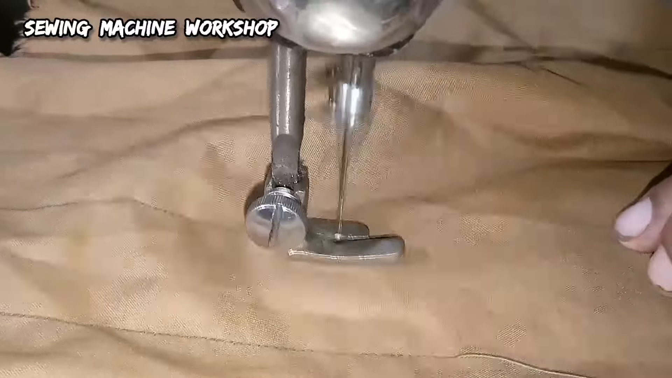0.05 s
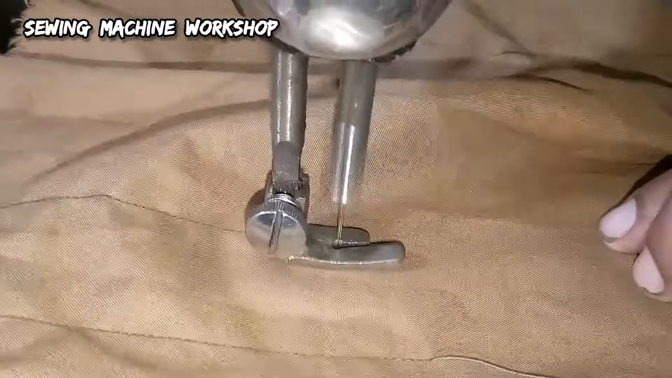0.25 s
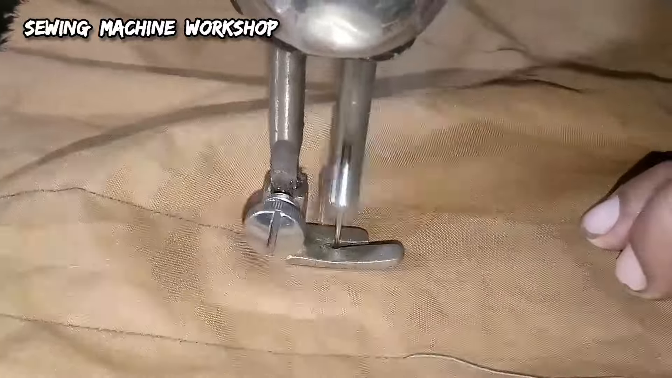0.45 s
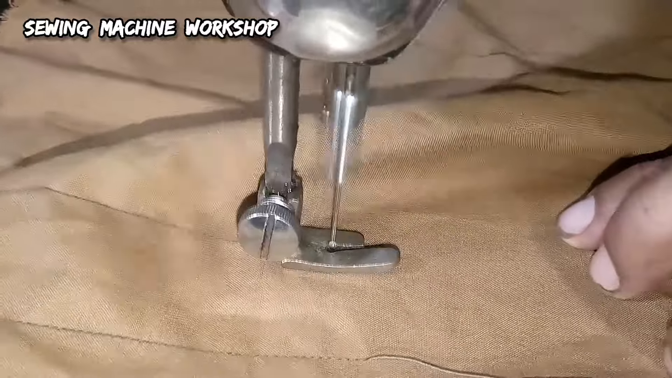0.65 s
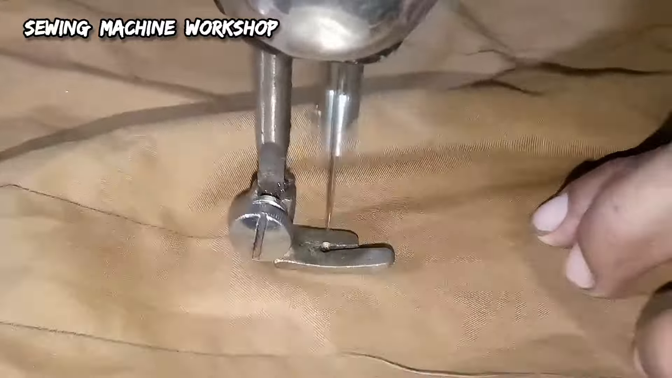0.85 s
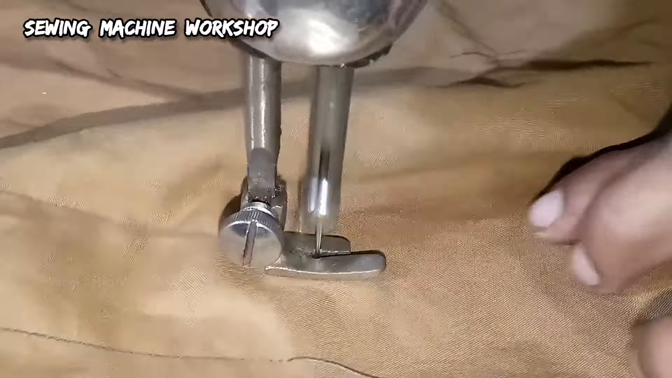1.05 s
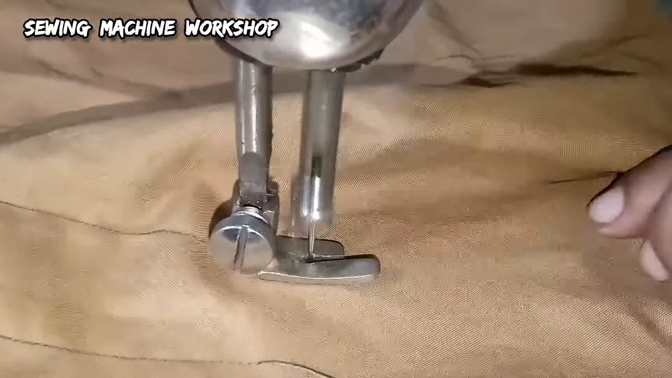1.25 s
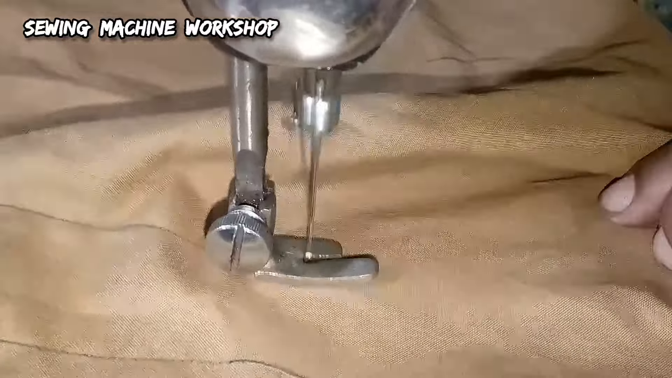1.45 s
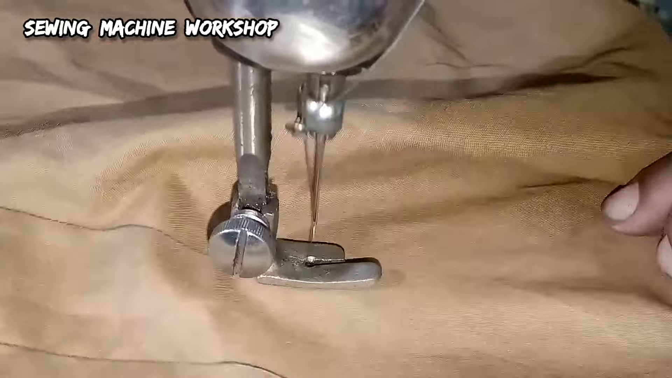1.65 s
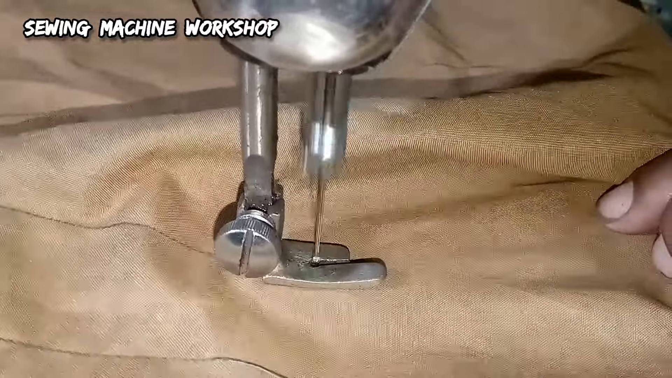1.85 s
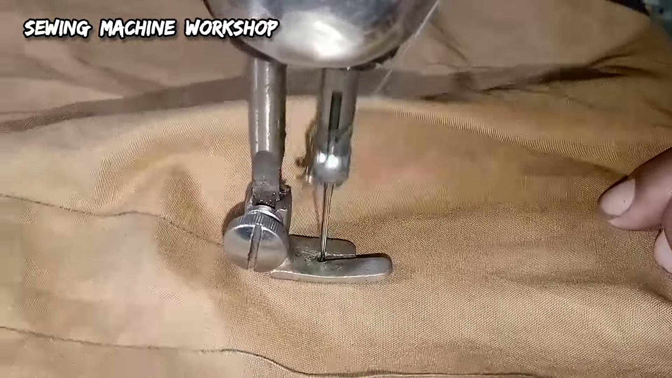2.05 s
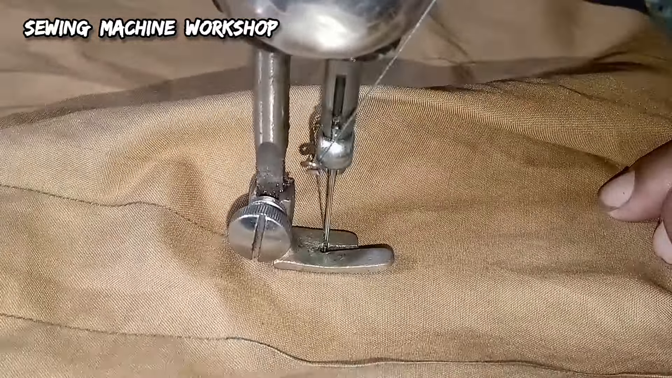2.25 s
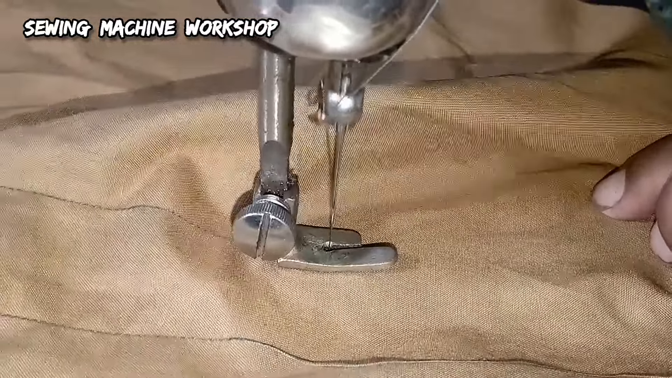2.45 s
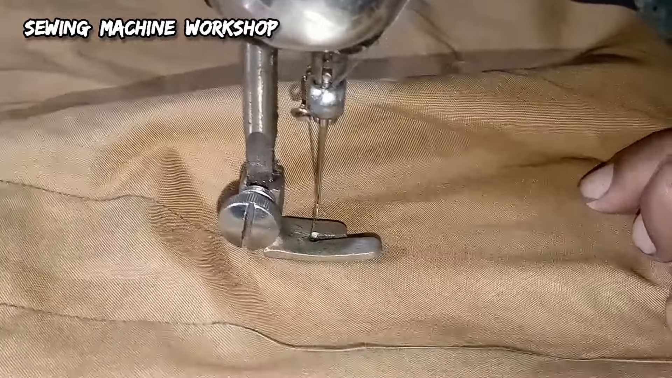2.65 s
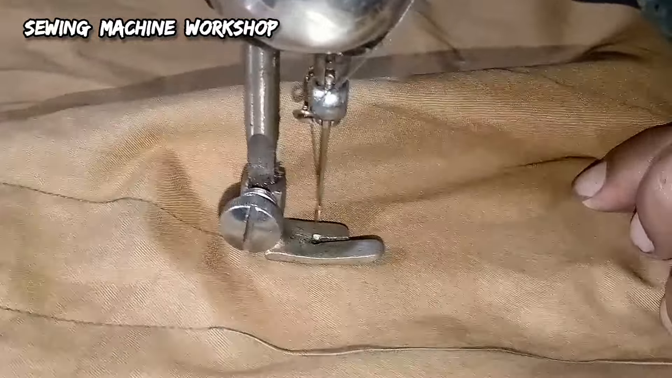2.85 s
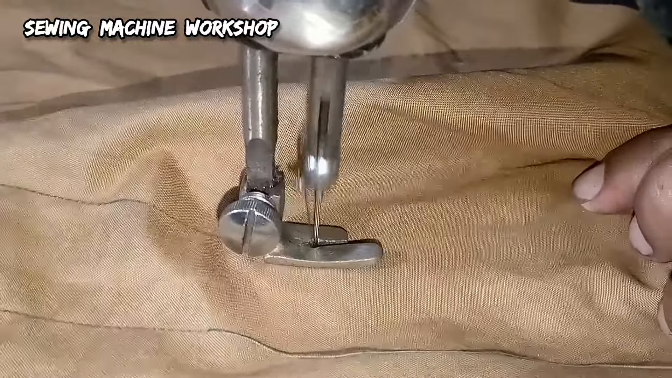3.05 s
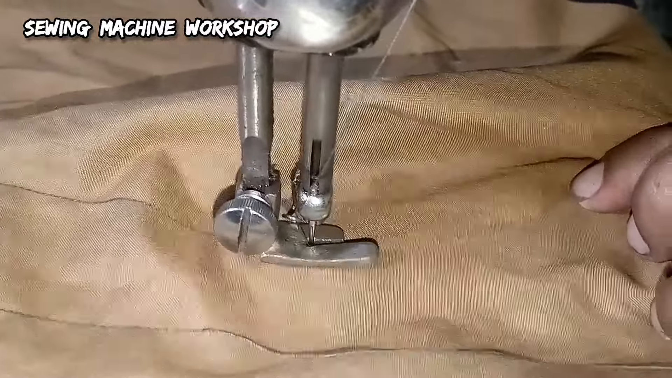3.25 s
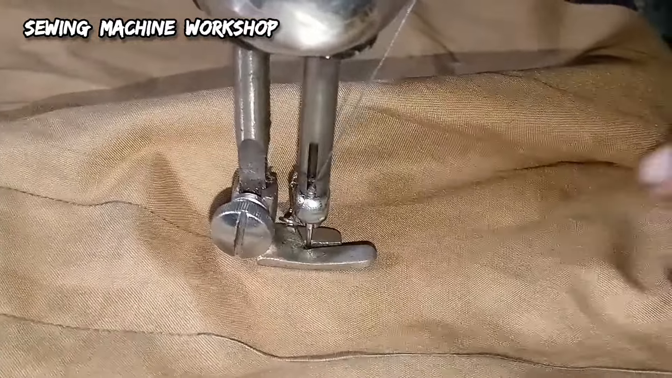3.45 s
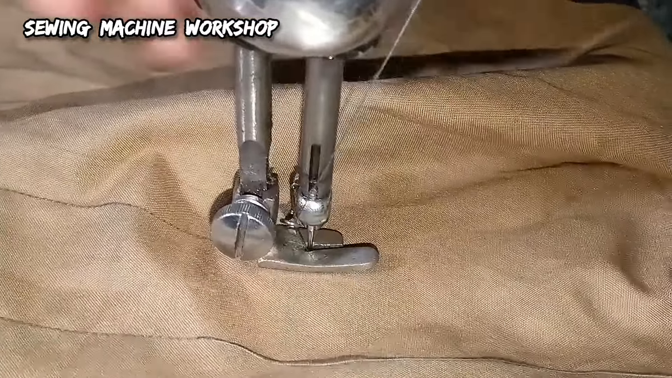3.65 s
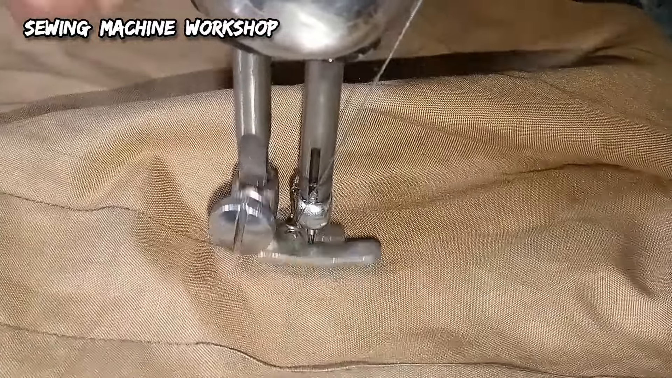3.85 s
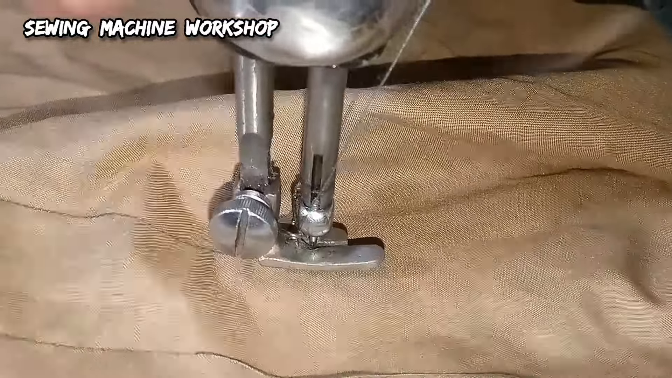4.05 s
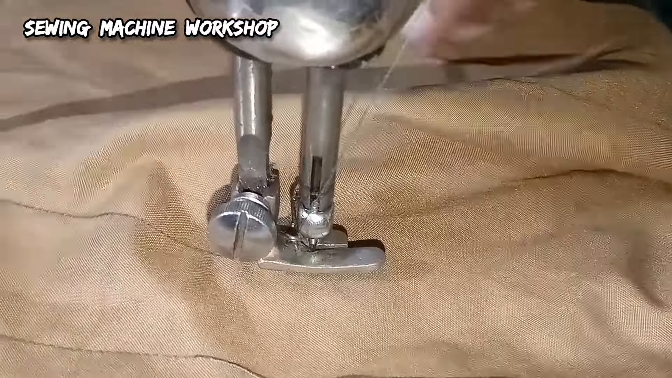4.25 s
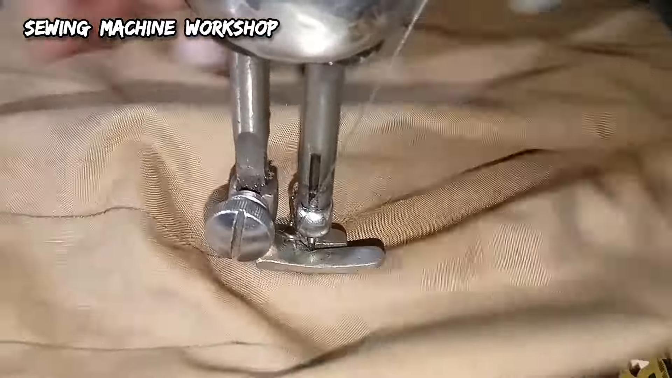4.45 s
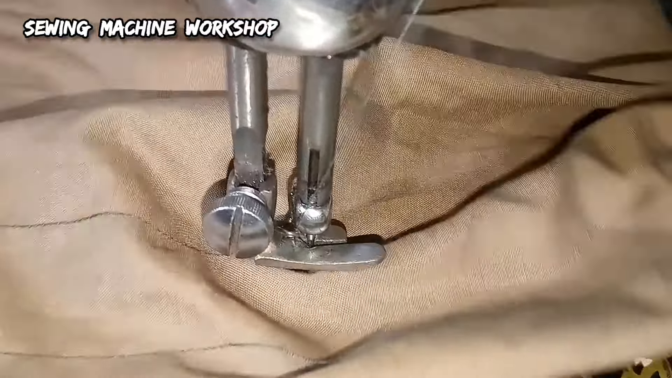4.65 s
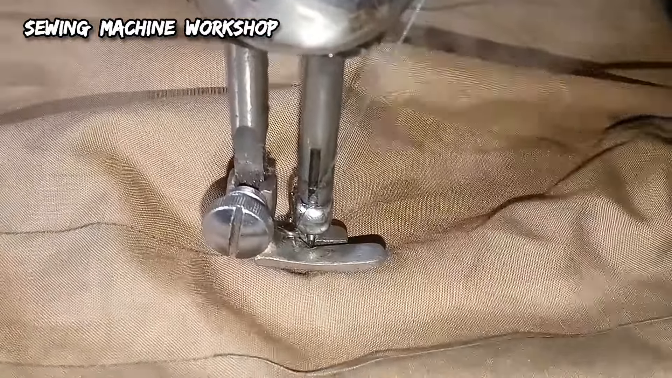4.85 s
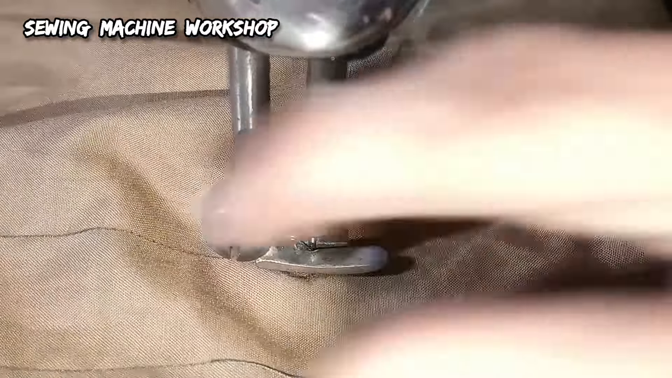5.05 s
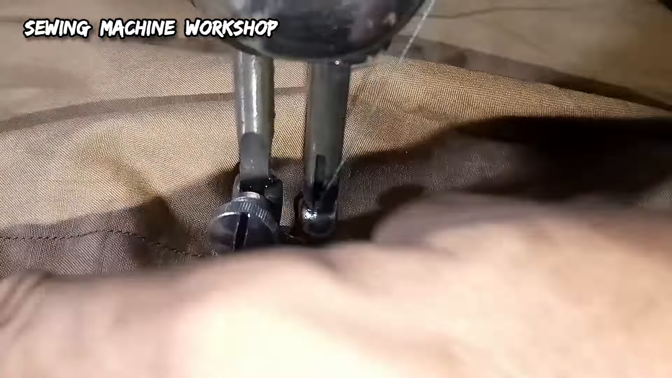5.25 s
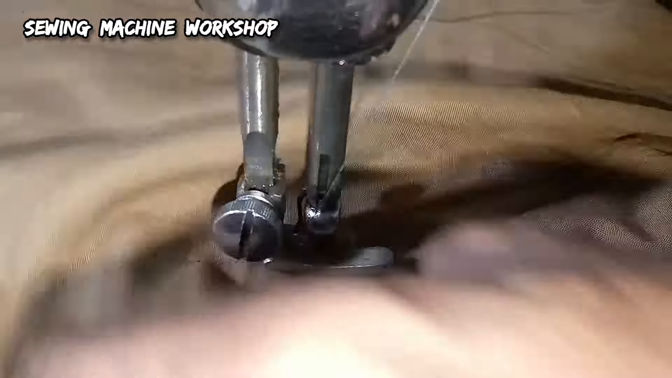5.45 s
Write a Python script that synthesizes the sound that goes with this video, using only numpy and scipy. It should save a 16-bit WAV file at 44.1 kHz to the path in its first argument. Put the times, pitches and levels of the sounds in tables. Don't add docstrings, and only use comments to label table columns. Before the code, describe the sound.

The sound begins with a sewing machine already running, very close: about eighteen sharp metallic clacks a second, each with steel ring, iron arm knock, and gear rattle between, over a low wooden table rumble. An especially hard clack comes near 0.96 s. From about 1.1 s it slows, the clacks separating and dulling, with last loose knocks at 1.7, 1.9 and 1.96 s. Then it is much quieter: low room and street murmur, faint hiss, and a distant high cricket throbbing about ten times a second. From 2.3 to 3.4 s come tiny irregular ticks, fine scratching and soft crackling cloth, with a clearer double tick at 3.14. A dull wooden thud falls at 3.8, then a bright lever crack with a heavier landing at 3.94. Between 4.4 and 5.5 s fabric rustles and small soft bumps tail off. Phone microphone, little deep bass, short close wall echo.

```python
import sys
import numpy as np
from scipy import signal
from scipy.fft import rfft, irfft
from scipy.io import wavfile
from scipy.ndimage import uniform_filter1d

SR = 44100
rng = np.random.default_rng(int(sys.argv[2]) if len(sys.argv) > 2 else 0)


def undo_db(level):
    steps = np.asarray(level, float) / 20
    return 10 ** steps


def unload_wav(signal):
    wavfile.write(
        sys.argv[1],
        SR,
        np.round(np.clip(np.atleast_2d(signal).T, -1, 1) * 32767).astype(np.int16),
    )


N = 242546
TIME = np.arange(N) / SR

# t/s, treble peak/dB, bed plate peak/dB, arm ring/dB
STITCH = [(0.0152, -29, -36, -22.5), (0.0706, -22, -20, -25.5), (0.1258, -20, -18, -22),
          (0.1788, -27, -25, -24), (0.2418, -25.5, -17, -22.5), (0.2927, -29, -38, -32),
          (0.3529, -28, -20.5, -22.5), (0.4147, -28, -27.5, -18.5), (0.4754, -24, -14.5, -18),
          (0.5281, -25.5, -22, -21), (0.5822, -26.5, -24.5, -21), (0.6377, -24.5, -19.5, -32),
          (0.6968, -27, -22.5, -28), (0.7508, -25, -33.5, -29), (0.8059, -24, -20, -15),
          (0.857, -24, -33, -15), (0.9087, -28.5, -17, -22), (0.9589, -18.5, -7, -16.5),
          (1.0213, -25.5, -17, -29), (1.084, -25.5, -28, -30), (1.1488, -28.5, -22.5, -24),
          (1.2063, -28, -26, -34), (1.275, -36, -24, -24), (1.349, -33, -20, -30), (1.4276, -29, -28, -25),
          (1.512, -30.5, -17.5, -46), (1.6046, -38, -15, -36), (1.723, -36, -18.5, -40),
          (1.8937, -41, -19.5, -53)]
START_S, CLACK_DB, BED_DB, ARM_DB = np.transpose(STITCH)
TURN_S = np.abs(np.diff(np.append(START_S, 1.6)))

# f/Hz, width/Hz, level/dB
FRAME = [(183, 21, -12.5), (251.6, 21.2, -4), (282, 16.5, -4), (333, 57, -10), (412.3, 18.4, -1.5),
         (446.1, 11, -2), (546, 350, -17.5)]
# f/Hz, width/Hz, level/dB
ARM = [(625, 15, -21.5), (783, 63, -11.5), (963, 35, -16.5), (1056.6, 20, 1), (1196, 1100, -22)]
# f/Hz, width/Hz, level/dB
BED = [(1562, 180, -6), (1797, 68, 3), (1907, 75, 3), (2087, 296, -3.5), (2389, 110, 4), (2573, 145, 0.5),
       (2811, 110, -3.5), (3048, 720, -15.5)]
# f/Hz, width/Hz, level/dB
STEEL = [(4905, 460, -4.5), (5657, 330, 1.5), (6173, 286, 6), (6573, 340, -2), (6990, 540, -9.5)]
# f/Hz, width/Hz, level/dB
AIR = [(8600, 860, -2), (10000, 1200, -3.5), (10800, 770, -3), (12300, 2700, -13), (14900, 900, -4.5)]


def unit(x):
    return x / np.sqrt(np.mean(x ** 2))


def steady(x, window_s=.12):
    return x / np.sqrt(uniform_filter1d(x ** 2, int(window_s * SR)) + 1e-12)


def swell(s, rise_s, hold_s, fall_s, db):
    early = np.maximum(s - TIME, 0) / rise_s
    late = np.maximum(TIME - s - hold_s, 0) / fall_s
    return undo_db(db - 30 * (early + late))


def filtered(x, order, hz, kind):
    return signal.sosfilt(signal.butter(order, hz, kind, fs=SR, output="sos"), x)


def resonate(x, modes):
    out = 0
    for k, (hz, width_hz, db) in enumerate(modes):
        mode = signal.lfilter(*signal.iirpeak(hz, hz / width_hz, SR), x)
        out = out + (-1) ** k * undo_db(db) * mode
    return out


def treble(force):
    cluster = filtered(resonate(force, STEEL), 3, [4300, 7600], "bandpass")
    top = filtered(resonate(force, AIR), 4, 7800, "highpass")
    return cluster + undo_db(-25.5) * top


def ring(force, part):
    if part is STEEL:
        return treble(force)
    return filtered(resonate(force, part), 3, 1.45 * part[-1][0], "lowpass")


def clicks(per_s, spread_db):
    when = rng.random(N) < per_s / SR
    size_db = spread_db * np.minimum(rng.exponential(size=N), 3)
    return unit(when * rng.standard_normal(N) * undo_db(size_db))


def blows(times_s, dbs, contact_ms, tick=1):
    force, t = np.zeros(N + 1024), np.arange(1024) / SR
    chatter = rng.standard_normal((len(times_s), 1024)) * 0.22
    chatter[:, 0] = tick
    for s, db, ms, row in zip(times_s, dbs, contact_ms, chatter):
        i = int(np.clip(s * SR, 0, N - 1))
        row = row * np.exp(-1000 * t / max(ms, .02))
        force[i:i + 1024] += undo_db(db) * row / np.sqrt(np.sum(row ** 2))
    return force[:N]


def struck(part, times_s, peak_db, contact_ms, tick=1):
    reference = np.abs(ring(signal.unit_impulse(4096), part)).max()
    return ring(blows(times_s, peak_db, contact_ms, tick), part) / reference


def shaft_turns(**after_last):
    return np.interp(TIME, np.append(-.04, START_S), np.arange(len(START_S) + 1.), **after_last)


def running_levels():
    # t/s, level/dB
    load = [(0, -16.5), (.03, -24), (.42, -26.5), (.58, -24), (.96, -24), (1.1, -26), (1.6, -33),
            (1.85, -45), (2.2, -68)]
    full_db = [-46, -34, -31.5, -29]
    slopes = [0.4, 0.91, 0.92, 0.99]
    # t/s, rise/s, held/s, fall/s, level over coasting/dB
    pulls = [
        (.1, 0.55, 0.19, .15, 11.5),
        (.52, 0.31, .58, .08, 9),
    ]
    full_load_db, coast_db_per_s = -25, 400
    coast_s = np.maximum(TIME - load[-1][0], 0)
    load_db = np.interp(TIME, *np.transpose(load)) - full_load_db - coast_db_per_s * coast_s
    table, frame, arm, bed = [db + slope * load_db for db, slope in zip(full_db, slopes)]
    pull_db = 20 * np.log10(1 + sum(swell(*pull) for pull in pulls))
    return load_db, [table + pull_db, frame + 0.36 * pull_db, arm, bed, bed - 13]


def links_and_gears(load_db, part_db):
    # f/Hz, width/Hz, level/dB
    table_modes = [(92.7, 36, -13.5), (125.7, 17, 10), (62.6, 23, -8.5)]
    # share of turn, then level/dB in table, frame, arm, bed plate, treble
    contacts = [(.05, 14, 8.5, -15.5, -5, 0.5), (.2, -8, 1, 2, 1, -1.5), (.45, -10, 4.5, 1.5, 1.5, -2.5),
                (.62, -19, 8.8, -9.5, -5.5, 0.5), (.82, -6, 3.5, 2.5, -7.5, -26)]
    rattle_per_s = [1450, 1488, 1309, 996, 1070]
    rattle_db = [2.5, 3, -2, 0, -1]
    share, *contact_db = np.transpose(contacts)
    share = share + .025 * rng.standard_normal((len(START_S), len(share)))
    when_s = (START_S[:, None] + TURN_S[:, None] * share).ravel()
    link_gain = undo_db(.3 * load_db)
    parts = (table_modes, FRAME, ARM, BED, STEEL)
    trims_db = (-5, 0, 0, 0, 0)
    out = 0
    for part, db, trim_db, pattern_db, per_s, gear_db in zip(
            parts, part_db, trims_db, contact_db, rattle_per_s, rattle_db):
        scatter_db = np.tile(pattern_db, len(START_S)) + 1.9 * rng.standard_normal(len(when_s))
        links = blows(when_s, scatter_db, np.full_like(when_s, 4), tick=0.79)
        links = steady(links + 1e-5 * rng.standard_normal(N), 0.17)
        force = links * link_gain + undo_db(gear_db) * clicks(per_s, 3)
        out = out + steady(ring(force, part)) * undo_db(db + trim_db)
    return out


def sliding_bars(bed_db):
    turned = shaft_turns(right=len(START_S) + .5) % 1
    hiss = unit(filtered(resonate(rng.standard_normal(N), AIR), 4, 6800, "highpass"))
    return hiss * undo_db(-64.5 + 0.4 * (bed_db + 28) - 6 * turned)


def table_shake(table_db):
    # multiple of the turn, level against the table/dB
    harmonics = [(5, -1), (6, -6.5), (7, -0.5), (14, -11)]
    angle = 2 * np.pi * uniform_filter1d(shaft_turns(), 4000)
    turns_per_s = np.gradient(angle) * SR / (2 * np.pi)
    shake = sum(undo_db(db) * np.sin(multiple * angle) for multiple, db in harmonics)
    return shake * np.clip(turns_per_s / 17, 0, 1) ** 5 * undo_db(table_db)


def murmur():
    # f/Hz, density/dB
    spectrum = [(15, -42.5), (25, -10), (103, 2.5), (158, -4), (231, -4.5), (316, -8.5), (431, -8.5),
                (680, -18), (766, -15.5), (863, -17), (2530, -20), (4190, -36), (5320, -29.5),
                (6760, -22.5), (7620, -33), (9910, -62), (16800, -120)]
    hz, db = np.transpose(spectrum)
    colour = undo_db(np.interp(np.log(np.fft.rfftfreq(N, 1 / SR) + 1), np.log(hz), db))
    drift = unit(uniform_filter1d(uniform_filter1d(rng.standard_normal(N), 6000), 6000))
    return undo_db(-62.5 + 0.58 * drift) * unit(irfft(rfft(rng.standard_normal(N)) * colour, N))


def cricket():
    chirp_s, first_chirp_s, sharpness = .104, .045, .9
    throb = np.exp(sharpness * np.cos(2 * np.pi * (TIME - first_chirp_s) / chirp_s))
    wing = [(6780, 370, 0)]  # f/Hz, width/Hz, level/dB
    return undo_db(-76.5) * unit(throb * resonate(resonate(rng.standard_normal(N), wing), wing))


def knocks():
    # t/s, bed plate peak/dB, arm ring/dB, treble/dB
    slack = [(.968, -17, -27.5, -27), (.979, -20.5, -31, -29.5), (1.7237, -26.5, -33, -43),
             (1.8992, -29, -38, -41), (1.9146, -53, -52, -50), (1.9615, -20.5, -43, -46.5),
             (1.9969, -39, -48, -69)]
    # t/s, bed plate peak/dB, arm ring/dB, treble/dB
    ticks = [(2.3492, -58, -64, -70), (2.3919, -55, -54.5, -65), (2.413, -46.5, -54.5, -61.5),
             (2.4799, -49, -49.5, -75), (2.5224, -47, -71, -57), (2.5279, -37.5, -47, -46.5),
             (2.5802, -39, -63, -74), (2.6852, -52, -70, -80), (2.7015, -45, -48.5, -78),
             (2.8742, -44, -48, -77), (2.9248, -47, -50.5, -84), (2.9703, -40.5, -45, -61),
             (2.991, -50, -47, -74), (3.0393, -50, -52, -73), (3.048, -52, -71, -64),
             (3.0725, -71, -50, -66), (3.1156, -48, -52, -66), (3.1405, -31.5, -39.5, -63),
             (3.1465, -33, -37, -68), (3.441, -45.5, -57, -73)]
    # t/s, bed plate peak/dB, arm ring/dB, treble/dB
    bumps = [(3.773, -42, -40.5, -57.5), (3.8572, -54, -71, -79), (4.382, -52, -60, -67),
             (4.5227, -56, -75, -62), (4.6402, -50.5, -57, -78), (4.9138, -60, -58, -65),
             (4.931, -53, -63, -64), (5.2421, -51, -48, -72), (5.2566, -44.5, -60, -70),
             (5.3006, -63, -59, -82), (5.3248, -60, -67, -71), (5.4796, -66, -62, -67)]
    # t/s, bed plate peak/dB, arm ring/dB, treble/dB
    lever = [
        (3.9132, -40, -33, -50),
        (3.9405, -22, -44, -33),
        (3.9454, -35, -20, -40),
    ]
    # frame against bed plate/dB, contact/ms
    touch = [(-18.5, 6.2), (-13, 3.6), (-3, 6.5), (-19, 6.5)]
    kinds = (slack, ticks, bumps, lever)
    s, bed_db, arm_db, steel_db = np.transpose(sum(kinds, []))
    frame_db, ms = np.repeat(touch, [len(kind) for kind in kinds], axis=0).T
    out = struck(FRAME, s, bed_db + frame_db, 0.095 * ms) + struck(ARM, s, arm_db, 0.024 * ms)
    out = out + struck(BED, s, bed_db + 0.5, ms, tick=0.36)
    out = out + struck(STEEL, s, steel_db + 8.5, .6 * ms, tick=0.21)
    snaps = [(lever[1][0], -50, 4.5), (.0005, -30, .3)]
    return out + struck(AIR, *np.transpose(snaps), tick=.6)


def shuttle():
    def contact(ms):
        return np.full_like(START_S, ms)

    clack = struck(STEEL, START_S, CLACK_DB + 4.5, contact(9), tick=0.27)
    clack = clack + struck(BED, START_S, BED_DB - 4.0, contact(4))
    thread = struck(AIR, START_S, CLACK_DB - 24.5, contact(16), tick=.4)
    crank = struck(ARM[3:4], START_S + .36 * TURN_S, ARM_DB, contact(.05), tick=5)
    return clack + thread + crank


def handling():
    # t/s, held/s, frame/dB, bed plate/dB, arm ring/dB
    nudges = [(2.3, 0.11, -64, -62.5, -76), (2.54, 0.044, -54.5, -46, -43.5), (3.07, 0.082, -64, -63, -59),
              (3.78, .02, -53, -78, -72), (3.9, 0.039, -52, -55, -60), (4.0, .08, -53.5, -56.5, -60),
              (4.41, 0.15, -83, -58, -82), (4.93, 0.037, -64, -75, -80), (5.18, 0.052, -54, -85, -85),
              (5.49, .03, -77, -60, -85)]
    rise_s, fall_s = 0.13, 0.11
    scratch = clicks(2500, 5.1)
    frame, bed, arm = sum(np.array([swell(s, rise_s, hold_s, fall_s, db) for db in dbs])
                          for s, hold_s, *dbs in nudges)
    gains = (frame, arm, bed, bed * undo_db(-12.5))
    parts = (FRAME, ARM, BED, STEEL)
    return undo_db(-9.0) * sum(unit(ring(scratch, part)) * gain for part, gain in zip(parts, gains))


def cloth():
    # t/s, rise/s, held/s, fall/s, level/dB
    drags = [(2.53, 0.038, 0.12, .03, -56), (2.75, 0.14, 0.012, 0.054, -63.5),
             (2.876, 0.026, 0.0054, .2, -58), (2.97, 0.0088, .004, 0.11, -52.5),
             (3.12, 0.011, 0.048, 0.34, -59), (4.47, 0.23, 0.076, 0.097, -57.5),
             (4.705, .1, .005, .04, -62.5), (4.8, .06, 0.087, .05, -66.5), (4.931, 0.044, .005, 0.086, -60)]
    # f/Hz, width/Hz, level/dB
    weave = [(408, 200, 2.5), (1250, 810, -1), (2280, 480, 3), (5800, 810, -16.5), (9000, 2500, -34),
             (14600, 1400, -40)]
    gain = uniform_filter1d(sum(swell(*drag) for drag in drags), 400)
    return undo_db(-1.5) * gain * unit(resonate(clicks(9000, 2.9), weave))


def thuds():
    # t/s, peak/dB, f/Hz, width/Hz
    hits = [(3.773, -34, 337, 53), (3.79, -31.5, 367, 70), (3.808, -56, 320, 60), (3.944, -31.5, 393, 38),
            (3.947, -31.5, 455, 44), (3.946, -43, 780, 57), (3.945, -35, 3210, 120),
            (3.941, -27, 5720, 200), (3.9415, -30, 6556, 200), (3.941, -40, 9100, 230),
            (3.441, -62, 3300, 31), (3.443, -51, 930, 215), (4.641, -52, 660, 200), (4.642, -46, 1750, 500),
            (4.452, -56, 430, 40), (4.51, -53, 420, 35), (4.915, -50, 440, 40), (4.966, -51, 450, 41),
            (5.155, -40.5, 265, 37), (5.155, -39.5, 417, 45), (6.1, -39, 330, 50), (5.9, -37.5, 266, 27),
            (5.196, -43, 413, 36), (5.25, -46, 304, 32), (5.258, -44.5, 456, 21), (5.245, -49.5, 1960, 80),
            (5.25, -49, 1293, 70), (5.33, -57, 1960, 50), (5.477, -54, 1960, 47)]
    out = 0
    for s, db, hz, width_hz in hits:
        hit = struck([(hz, width_hz, 0)], [s], [db], contact_ms=[.02], tick=5)
        out = out + uniform_filter1d(hit, int(SR / hz / 2) + 1)
    return undo_db(3.5) * out


def wall_echo(machine):
    t60_s, t = 0.26, np.arange(SR // 2) / SR
    tail = rng.standard_normal(len(t)) * np.exp(-np.log(1000) * t / t60_s) * (t > .004)
    tail = signal.lfilter(*signal.butter(1, 5000, fs=SR), tail)
    return signal.fftconvolve(machine, tail / np.sqrt(np.sum(tail ** 2)))[:N]


def scene():
    load_db, part_db = running_levels()
    running = links_and_gears(load_db, part_db) + sliding_bars(part_db[3]) + table_shake(part_db[0])
    machine = running + knocks() + shuttle() + handling() + cloth() + thuds()
    return (undo_db(-.5) * machine + undo_db(-14) * wall_echo(machine) + cricket() + murmur())[None]


def top_cut(x):
    return signal.sosfilt(signal.butter(12, 15800, fs=SR, output="sos"), x)


def record(dry):
    mic = filtered(dry, 2, 62, "highpass")
    mic = mic + undo_db(-84) * rng.standard_normal(dry.shape)
    return top_cut(mic)


dry = scene()
out = record(dry)
unload_wav(out)
```